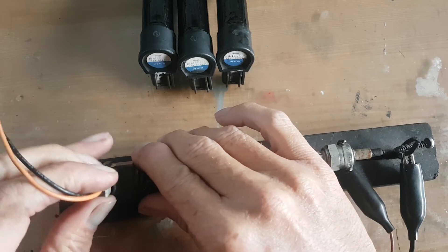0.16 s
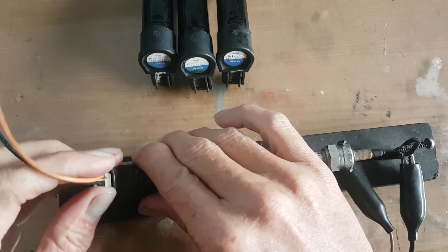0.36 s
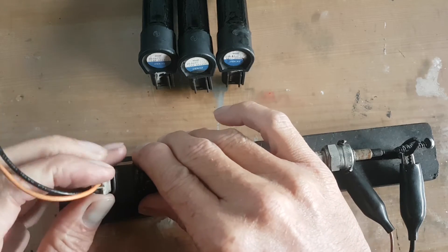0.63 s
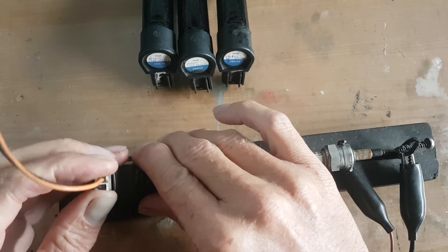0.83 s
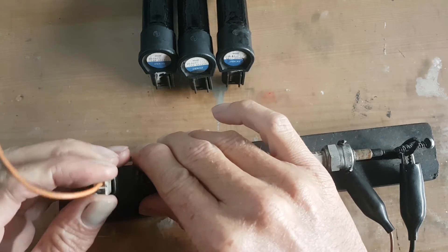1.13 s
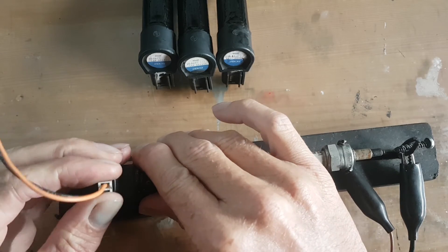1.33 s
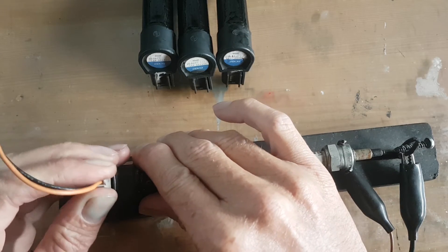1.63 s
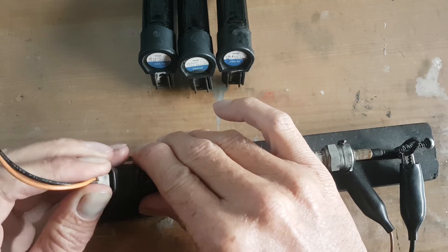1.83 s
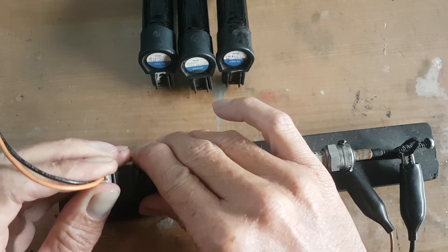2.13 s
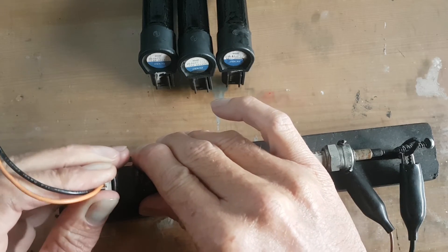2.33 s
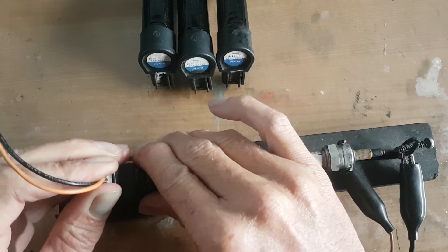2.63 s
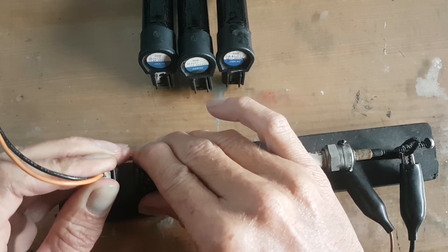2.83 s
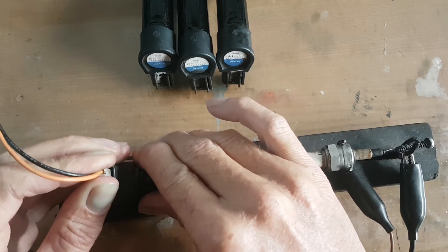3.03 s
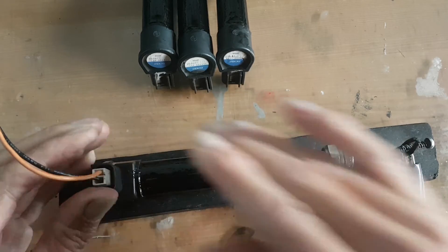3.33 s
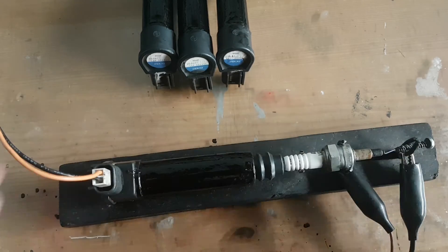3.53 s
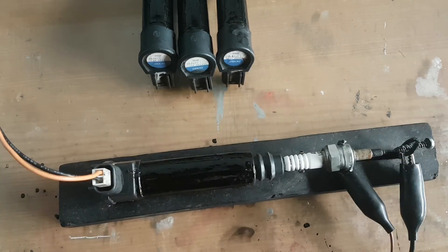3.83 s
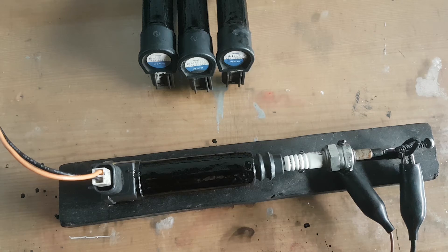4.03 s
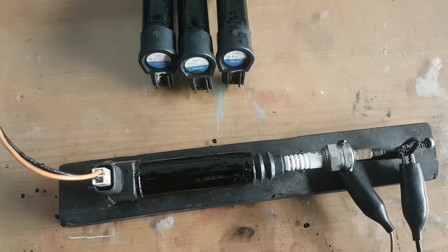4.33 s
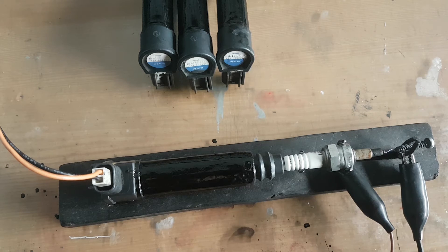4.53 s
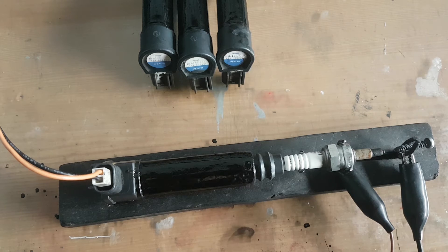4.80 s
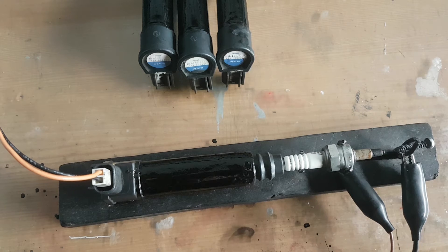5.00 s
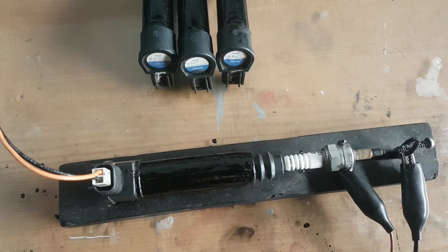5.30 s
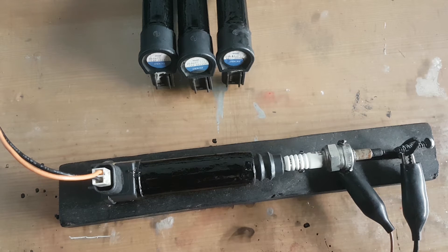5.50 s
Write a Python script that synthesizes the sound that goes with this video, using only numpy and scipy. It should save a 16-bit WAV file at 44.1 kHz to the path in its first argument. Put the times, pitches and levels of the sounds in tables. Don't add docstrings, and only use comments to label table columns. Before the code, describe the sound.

In a small room with a low fan hum and faint swelling drone, a connector knocks softly onto an ignition coil. One dry spark snaps, then three quickly, then one thinner. From about two seconds identical sparks run evenly, sixteen a second, to the end. Hands withdraw, the sound opens slightly, and a tiny plastic tick follows. Close stereo microphone at arm's length.

```python
import sys
import numpy as np
from scipy import signal
from scipy.fft import rfft, irfft, next_fast_len
from scipy.io import wavfile

SR = 44100
rng = np.random.default_rng(int(sys.argv[2]) if len(sys.argv) > 2 else 0)


def natural_amplitude(level_db):
    exponent = np.asarray(level_db, float) / 20
    return 10 ** exponent


def store_wav(level_fs):
    pcm = np.round(np.clip(np.atleast_2d(level_fs), -1, 1) * 32767)
    wavfile.write(sys.argv[1], SR, pcm.T.astype(np.int16))


N = 249606

# start_s, spark_count, left_db, right_db
CONTACTS = [
    (.36833, 1, 0, 0),
    (.79878, 3, -.5, 0),
    (1.59987, 1, -.7, -2.3),
    (2.09112, 58, -.5, 0),
]
# time_s, away (0 on the coil, 1 gone)
HANDS_AWAY = [
    (3.2, 0),
    (3.6, 1),
]
FIRST_PERIOD_MS = 62.27
FLOOR_TOP_HZ = 16150


def rms_one(x):
    return x / np.sqrt(np.mean(x ** 2) + 1e-20)


def at_hz(points, hz):
    point_hz, value = np.transpose(points)
    return np.interp(np.log(hz), np.log(point_hz), value)


def drift(rate_hz):
    r = np.exp(-80 * np.pi * rate_hz / SR)
    slow = signal.lfilter([1], [1, -2 * r, r * r], rng.standard_normal(N // 40 + 2002))[2000:]
    return np.interp(np.arange(N) / 40, np.arange(len(slow)), rms_one(slow))


def resonance(x, hz, width_hz):
    r = np.exp(-np.pi * width_hz / SR)
    zeros = np.array([1, 0, -1]) * (1 - r * r) / 2
    return signal.lfilter(zeros, [1, -2 * r * np.cos(2 * np.pi * hz / SR), r * r], x)


def body(x, modes):
    return sum((-1) ** k * natural_amplitude(db) * resonance(x, hz, width_hz) for k, (hz, width_hz, db) in enumerate(modes))


def peaks(x, bands):
    return sum(share * resonance(x, hz, width_hz) for hz, width_hz, share in bands)


def band(x, low_hz, high_hz):
    return signal.sosfilt(signal.butter(2, [low_hz, high_hz], "band", fs=SR, output="sos"), x)


def steep_cut(x, hz):
    return signal.sosfilt(signal.cheby2(14, 50, hz, fs=SR, output="sos"), x)


def hands_away():
    return np.interp(np.arange(N) / SR, *np.transpose(HANDS_AWAY))


def sparks(level_db, spread_db, fizz_db):
    s, left_db, right_db = spark_times()
    size = next_fast_len(N + SR // 2)
    train = impulses(s, spread_db * rng.standard_normal(len(s)), size)
    tail = irfft(train * rfft(room_tail(SR // 3), size), size)[:, :N]
    out = natural_amplitude(-7.5) * tail + at_the_ports(train, spark_fizz(s, fizz_db), size)
    out = near_reflections(out)
    shade = [np.interp(np.arange(N) / SR, s, natural_amplitude(side_db)) for side_db in (left_db, right_db)]
    return natural_amplitude(level_db) * out * shade


def spark_times():
    creep_ms, creep_sparks = .11, 1.3
    rows = []
    for start_s, count, left_db, right_db in CONTACTS:
        gaps_ms = FIRST_PERIOD_MS + creep_ms * np.log1p(np.arange(count - 1) / creep_sparks)
        times = start_s + np.r_[0, np.cumsum(gaps_ms / 1000)]
        rows += [(s, left_db, right_db) for s in times]
    s, left_db, right_db = np.transpose(rows)
    s = s + 1.5e-5 * rng.standard_normal(len(s))
    return s, left_db, right_db


def impulses(seconds, db, size):
    turn = -2j * np.pi * np.arange(size // 2 + 1) * SR / size
    return sum(natural_amplitude(g) * np.exp(turn * s) for s, g in zip(seconds, db))


def spark_fizz(s, fizz_db):
    decay_s = .0012
    strikes = np.zeros(N)
    strikes[(s * SR).astype(int)] = natural_amplitude(fizz_db)
    envelope = signal.lfilter([1], [1, -np.exp(-1 / (decay_s * SR))], strikes + 1e-18)
    return band(envelope * rng.standard_normal((2, N)), 7000, .45 * SR)


def at_the_ports(train, fizz, size):
    # delay_ms, level_db
    paths_left = [(0, 0), (.256, -18), (.45, -24), (.705, -9.5), (1.66, -26), (2.547, -15), (2.812, -15.5)]
    # delay_ms, level_db
    paths_right = [(.178, 0), (.482, -5.5), (1.003, -15), (1.303, -19), (1.75, -30), (3.259, -21.5)]
    # pitch_hz, width_hz, level_db
    port_left = [(240.0, 540.0, -9.0), (1090.0, 500.0, -1.5), (3450.0, 1010.0, -5.0),
                 (7030.0, 5780.0, -15.0), (13600.0, 1690.0, 8.5), (13750.0, 1330.0, 7.0),
                 (4620.0, 310.0, -13.0)]
    # pitch_hz, width_hz, level_db
    port_right = [(330.0, 280.0, -6.5), (1300.0, 560.0, 6.0), (4350.0, 920.0, 1.5), (7440.0, 1430.0, -1.0),
                  (7540.0, 580.0, 3.0), (11590.0, 400.0, -10.0), (840.0, 150.0, -5.5)]
    out = np.zeros((2, N))
    for k, (paths, port) in enumerate([(paths_left, port_left), (paths_right, port_right)]):
        delay_ms, db = np.transpose(paths)
        shocks = irfft(train * impulses(delay_ms / 1000, db, size), size)[:N]
        out[k] = -body(shocks + fizz[k], port)
    return out


def room_tail(size):
    # pitch_hz, t60_s, left_db, right_db
    tail_bands = [(392, 0.12, -110.5, -53), (700, 0.14, -65, -36), (1118, 0.66, -52, -50),
                  (2110, 0.38, -56.5, -48), (3600, 0.21, -49, -46), (5650, 0.2, -57, -47.5),
                  (8760, 0.088, -93, -59), (13700, 0.21, -42.5, -90)]
    t, out = np.arange(size) / SR, 0
    for hz, t60_s, left_db, right_db in tail_bands:
        noise = rms_one(band(rng.standard_normal((2, size)), hz / 1.35, hz * 1.35))
        decay_db = 60 * t / np.clip(t60_s, .16, .4)
        out = out + noise * natural_amplitude([[left_db], [right_db]] - decay_db)
    clutter = natural_amplitude(8) * np.exp(-t / .003) * np.clip((t - .001) / .002, 0, 1)
    walls = np.interp(t, [.004, .011], [.3, 1], left=0)
    return steep_cut(out * (clutter + walls), FLOOR_TOP_HZ)


def near_reflections(out):
    # port (0 left, 1 right), delay_ms, level_db
    dull_echoes = [
        (0, 2.75, -15),
        (0, 19.6, -16),
        (1, 2.6, -20),
        (1, 19.5, -22),
    ]
    # pitch_hz, width_hz, share
    left_only = [(825, 100, 0.79), (587, 1200, -0.33), (2760, 1000, -0.11), (1570, 650, 0.11)]
    # pitch_hz, width_hz, share
    right_only = [(544, 40, 0.63), (920, 98, 0.1), (1210, 660, -0.27), (790, 107, 0.26), (8900, 210, -0.44),
                  (12200, 820, -.4), (15600, 6000, 0.91)]
    # pitch_hz, width_hz, share
    cancelled = [(522, 92, 0.7), (880, 194, -0.34), (1139, 250, 0.43), (1440, 280, -0.11),
                 (1850, 140, 0.23), (2300, 355, 0.48), (3150, 75, 0.68), (3450, 240, -0.29),
                 (4140, 270, 0.55), (4425, 310, -0.71), (5130, 220, 0.49), (13600, 2000, 0.19),
                 (713, 34, 0.31)]
    # pitch_hz, width_hz, share
    opened = [(2690, 710, 0.31), (3380, 150, 0.013), (4490, 430, -0.27), (1850, 140, -0.57)]
    dull = band(out, 300, 3200)
    for k, delay_ms, db in dull_echoes:
        lag = round(delay_ms * SR / 1000)
        out[k, lag:] += natural_amplitude(db) * dull[k, :-lag]
    for k, bands in enumerate([left_only, right_only]):
        out[k] -= peaks(out[k], bands)
    for hz, width_hz, share in cancelled:
        out = out - share * resonance(out, hz, width_hz)
    out = out + hands_away() * peaks(out, opened)
    cupped = np.exp(-((np.arange(N) / SR - CONTACTS[2][0]) / .1) ** 2)
    return out - .35 * cupped * resonance(out, 1050, 1100)


def knock():
    # pitch_hz, width_hz, level_db
    knock_modes = [(165, 100, -14), (232, 30, -9), (350, 100, -23), (590, 70, -16), (1100, 700, -35),
                   (2600, 1800, -41), (4610, 300, -34.5)]
    return steep_cut(touch(.2615, knock_modes, .003, pan_db=.3), 7000)


def tick():
    # pitch_hz, width_hz, level_db
    tick_modes = [(2050, 450, -18), (2750, 300, -18), (3500, 300, -26), (4550, 400, -29), (6800, 2000, -36),
                  (11500, 3000, -35)]
    return touch(3.6992, tick_modes, .002, pan_db=.5)


def touch(at_s, modes, length_s, pan_db):
    t = np.arange(N) / SR - at_s
    rub = .5 * rng.standard_normal(N) * np.exp(-np.clip(t, 0, 1) / length_s) * (t > 0)
    rub[round(at_s * SR)] += 4
    return body(rub + 1e-18, modes) * natural_amplitude([[pan_db], [-pan_db]])


def fan(wobble_db):
    # multiple, left_db, right_db, right_lag_rad
    harmonics = [(1.0, -53.5, -54.5, 0.077), (2.0, -72.5, -75, 0.28), (4, -69, -70.5, 2),
                 (5, -63, -64, 2.05), (8, -78, -71.5, 2.8), (10, -76.5, -76, 2.24), (12, -83, -83, 1.7),
                 (15, -79, -74, 1.83), (16, -75.5, -77, 2.1), (20, -70.5, -67.5, 1.7),
                 (25, -76, -73.5, 1.86), (30, -83, -81, 1.5), (35, -80.5, -78, 2.12)]
    hz = fan_speed() * (1 + 0.00049 * drift(2.95))
    unshaded = hands_away()
    phase, out = 2 * np.pi * np.cumsum(hz) / SR, 0
    for k, left_db, right_db, lag in harmonics:
        start = 2 * np.pi * rng.random()
        sway = np.sqrt(2) * natural_amplitude(wobble_db * drift(3))
        if round(k) == 5:
            sway = sway * natural_amplitude(2.5 * unshaded)
        angle = round(k) * phase + start
        out = out + sway * natural_amplitude([[left_db], [right_db]]) * np.sin([angle, angle - lag])
    return out


def fan_speed():
    idle_hz, sag_hz, lag_s = 118.85, 2.25, .4
    t, r = np.arange(N) / SR, np.exp(-1 / (lag_s * SR))
    load = np.zeros(N)
    for start_s, count, *_ in CONTACTS:
        end_s = start_s + (count - 1) * FIRST_PERIOD_MS / 1000
        load += (t > start_s) & (t < end_s)
    return idle_hz - sag_hz * signal.lfilter([1 - r], [1, -r], load + 1e-18)


def room_air(level_db, patchy_db):
    # pitch_hz, level_db (per Hz)
    air_spectrum = [(22, -31), (40, -17.5), (130, -11.5), (420, -22), (800, -28.5), (2300, -29),
                    (8800, -49), (12500, -44.5)]
    # pitch_hz, likeness
    likeness = [(30, 0.84), (130, 0.86), (290, 0.64), (640, 0.4), (1400, 0.34), (15000, 0.0)]
    # pitch_hz, difference_db
    air_balance = [(700, -2), (1300, -3.5), (5000, 0), (8500, 0), (13000, 3.5)]
    out, edges_hz = 0, 22 * 2 ** np.arange(0, 10, 1 / 2.5)
    white = rng.standard_normal((2, 2, N))
    for k, (low, high) in enumerate(zip(edges_hz, edges_hz[1:])):
        centre = np.sqrt(low * high)
        mid, side = band(white[k % 2], low, high)
        alike = at_hz(likeness, centre)
        gain = natural_amplitude(at_hz(air_spectrum, centre) + patchy_db * drift(4.3))
        gain = gain * natural_amplitude(at_hz(air_balance, centre) * np.array([[.5], [-.5]]))
        out = out + gain * (np.sqrt(1 + alike) * mid + np.sqrt(1 - alike) * side * [[1], [-1]])
    return natural_amplitude(level_db) * rms_one(steep_cut(out, FLOOR_TOP_HZ))


def room_rumble(surge_db):
    # pitch_hz, width_hz, level_db
    room_modes = [(68, 34, -60.5), (96.94, 8.2, -63), (149.3, 10.4, -68), (224, 7.5, -69.5)]
    out = 0
    for hz, width_hz, db in room_modes:
        ringing = resonance(resonance(rng.standard_normal(N), hz, width_hz), hz, width_hz)
        out = out + natural_amplitude(db + surge_db * drift(1.44)) * rms_one(ringing)
    return out


def drone():
    # peak_s, level_db
    swells = [(.18, -53.5), (1.2, -55), (2.16, -55), (2.55, -56.5), (3.05, -54.5), (3.52, -53), (4.27, -56),
              (4.73, -53.5), (5.22, -55), (5.52, -53.5)]
    pitch_hz, swell_s = 147, 0.16
    t = np.arange(N) / SR
    level = sum(natural_amplitude(db) * np.exp(-((t - s) / swell_s) ** 2) for s, db in swells)
    phase = 2 * np.pi * np.cumsum(pitch_hz * (1 + 0.014 * drift(5.9))) / SR
    return np.sqrt(2) * level * np.sin(phase)


def scene():
    bench = sparks(0, spread_db=.3, fizz_db=-21) + knock() + tick()
    room = room_air(-59.5, patchy_db=1.0) + room_rumble(surge_db=2.5)
    return bench + fan(wobble_db=.8) + room + drone()


def low_pass(x):
    return signal.sosfilt(signal.butter(12, 17000, fs=SR, output="sos"), x)


def record(dry):
    mix = steep_cut(dry, 16950)
    return low_pass(mix)


dry = scene()
out = record(dry)
store_wav(out)
```